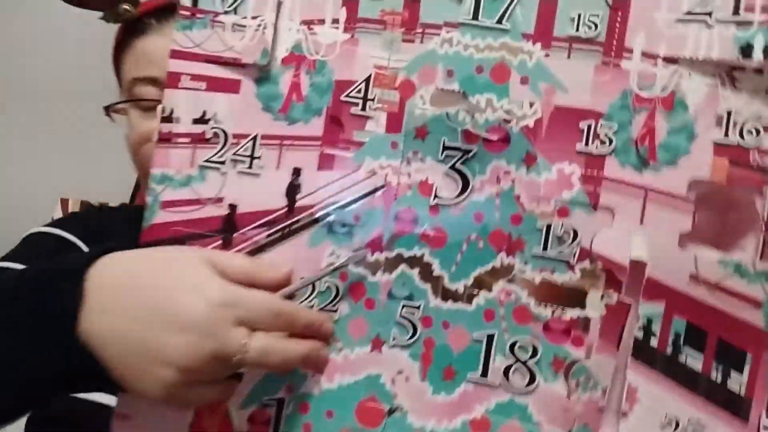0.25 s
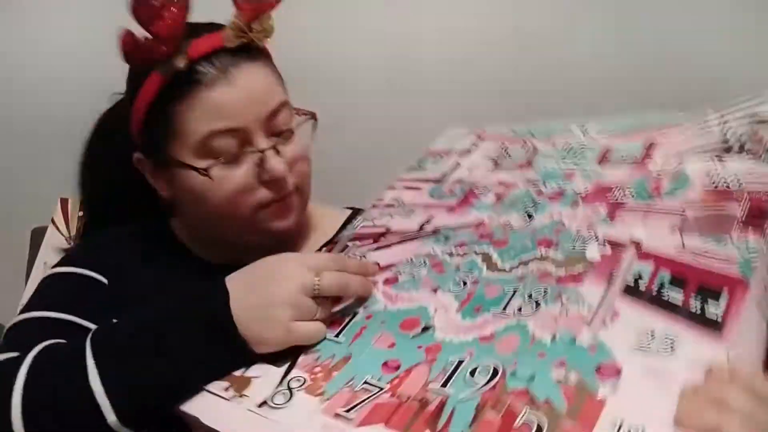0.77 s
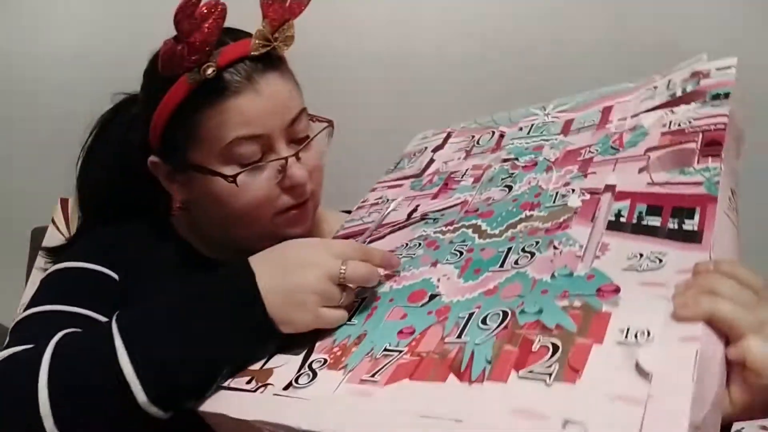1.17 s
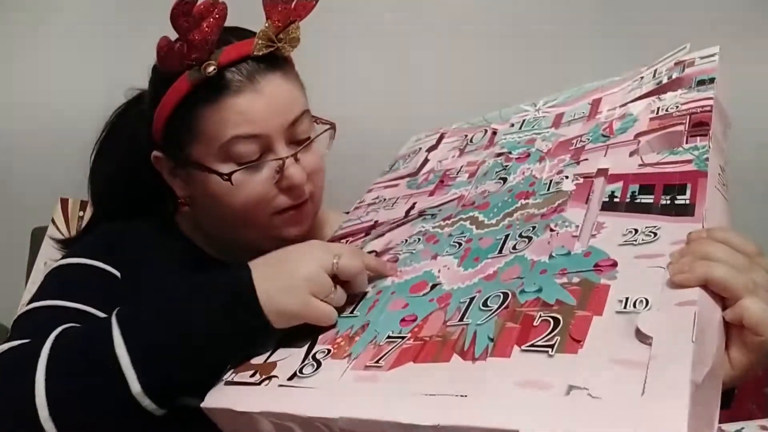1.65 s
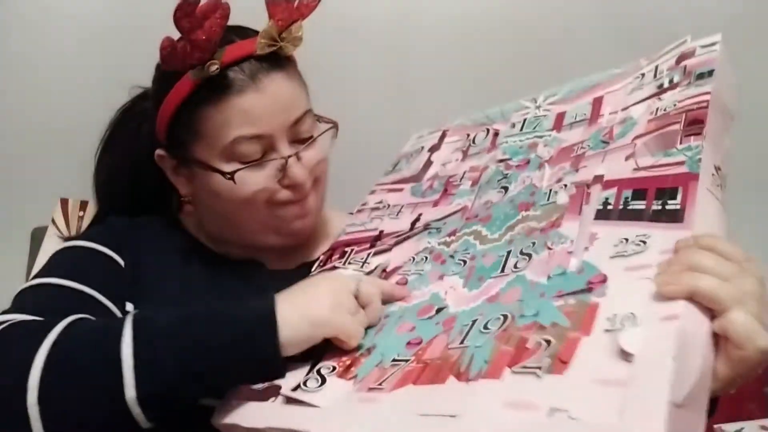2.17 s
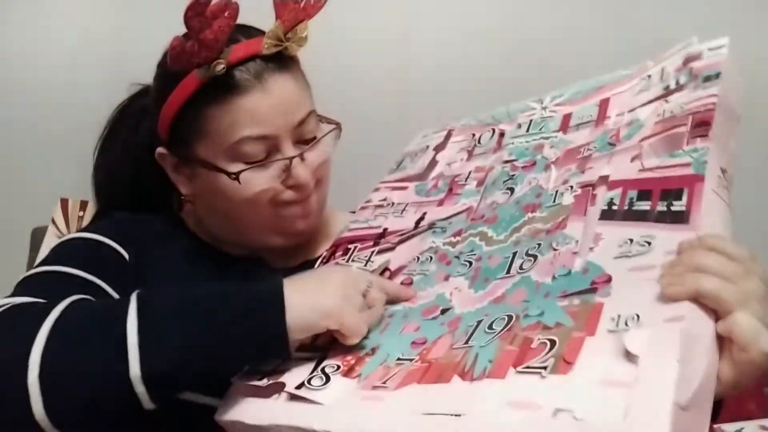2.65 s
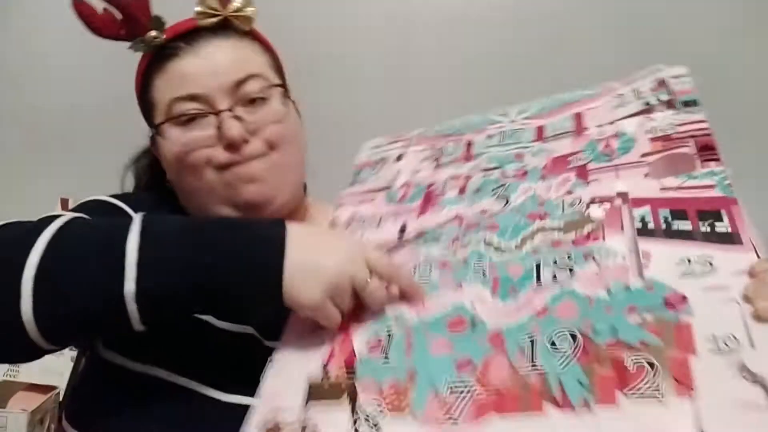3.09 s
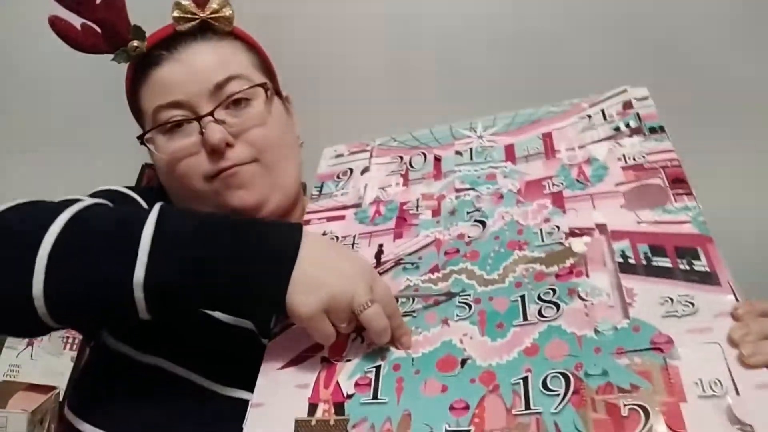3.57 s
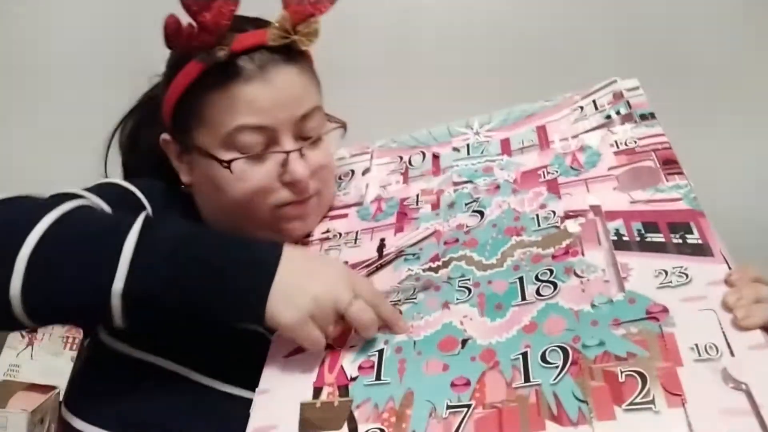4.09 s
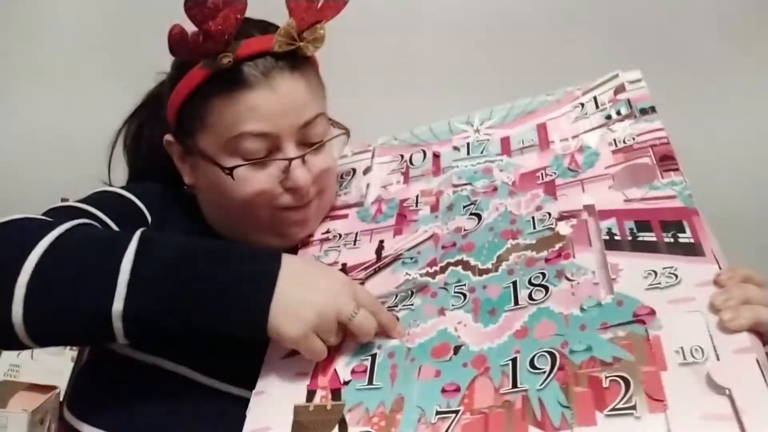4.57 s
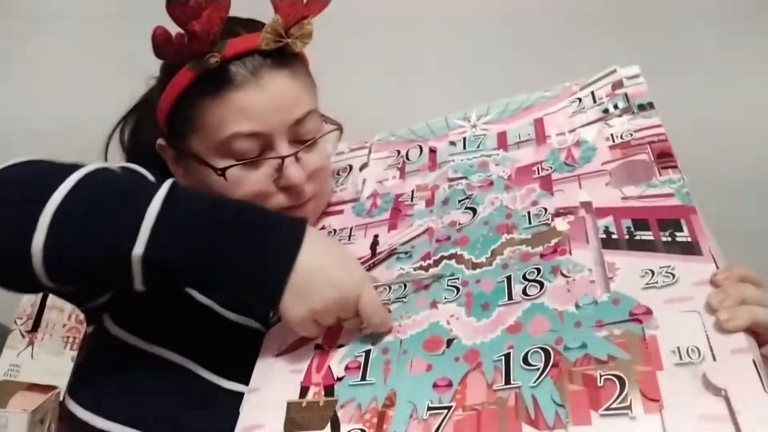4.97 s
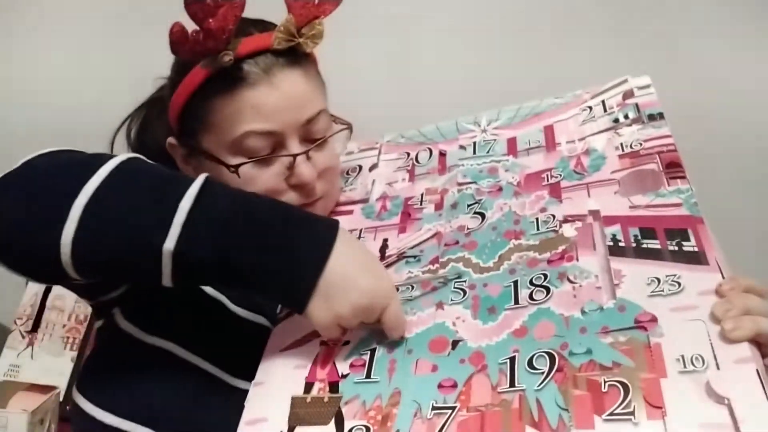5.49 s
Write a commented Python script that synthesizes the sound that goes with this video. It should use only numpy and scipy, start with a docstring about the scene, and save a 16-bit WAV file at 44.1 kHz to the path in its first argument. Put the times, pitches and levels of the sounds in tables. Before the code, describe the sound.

Close, dry clicking and rubbing on perforated cardboard, faint at first, cracking loudly twice before settling into softer picking and creaks.

```python
"""In a small furnished room, fingers pick, scratch and press at the perforated door of a stiff, hollow cardboard box.
Each contact is a short burst of noise for the crack of the paper skin, plus a jolt that rings the board and the hollow.
Between contacts, noise gated by tiny slips makes the rub and creak; short strokes and low bumps join in.
The room answers the contacts with a tail of fading noise, over a faint hum and hiss.
Two microphone ports close by hear it all in stereo."""
import sys
import numpy as np
from scipy import signal
from scipy.fft import rfft, irfft, next_fast_len
from scipy.io import wavfile
from scipy.ndimage import uniform_filter1d, map_coordinates

SR = 44100
rng = np.random.default_rng(int(sys.argv[2]) if len(sys.argv) > 2 else 0)


def int16_out(signal):
    """Quantize to a 16-bit WAV file."""
    q = np.round(np.clip(np.atleast_2d(signal).T, -1, 1) * 32767)
    wavfile.write(sys.argv[1], SR, q.astype(np.int16))


N = 252693  # length in samples


def amp(db):
    """Turn decibels into a gain."""
    return 10 ** (np.asarray(db) / 20)


def unit(x):
    """Scale each row to rms 1."""
    return x / np.sqrt(np.mean(x ** 2, -1, keepdims=True) + 1e-20)


def peak(x):
    """Scale each row so that its loudest 4 ms has rms 1."""
    return x / np.sqrt(np.max(uniform_filter1d(x ** 2, size=180), -1, keepdims=True))


def along(points, hz):
    """Read a curve of (Hz, value) points on a log frequency axis."""
    f, v = np.transpose(points)
    return np.interp(np.log(hz + 1), np.log(f + 1), v)


def curves(rows):
    """Give one value per sample for each column after the time."""
    s, *cols = np.transpose(rows)
    return [np.interp(np.arange(N) / SR, s, c) for c in cols]


def wobble(rate):
    """Draw a smooth random curve with this many knots a second."""
    knots = rng.standard_normal(int(N * rate / SR) + 4)
    return map_coordinates(knots, [np.arange(N) * rate / SR])


def filtered(x, response):
    """Multiply the spectrum of x by a response that depends on frequency."""
    n = x.shape[-1]
    m = next_fast_len(n + 4096)
    return irfft(rfft(x, m) * response(np.fft.rfftfreq(m, 1 / SR)), m)[..., :n]


def resonances(modes, extra_db=0):
    """Ring like a set of damped springs; extra_db changes the level of each mode (last axis)."""
    extra_db = np.broadcast_to(extra_db, np.shape(extra_db)[:-1] + (len(modes),))

    def response(f):
        total = 0
        for k, (centre, width, db) in enumerate(modes):
            level = (-1) ** k * amp(db + extra_db[..., k:k + 1])  # neighbours have opposite signs
            total = total + level * 1j * f * width / (centre * centre - f * f + 1j * f * width)
        return total
    return response


def colour(points):
    """Give the gain of a smooth spectrum of (Hz, dB) points."""
    return lambda hz: amp(along(points, hz))


def pair(a, b, alike):
    """Mix two unrelated signals into left and right that are as alike as asked at each frequency."""
    def turn(hz):
        return np.arccos(np.clip(along(alike, hz), -1, 1)) / 2
    mid = filtered(a, lambda hz: np.cos(turn(hz)))
    side = filtered(b, lambda hz: np.sin(turn(hz)))
    return np.array([mid + side, mid - side])


# ways the cardboard rings, before each spot favours some: centre_hz, width_hz, level_db
BOX_MODES = [(386, 16, -3.5), (643.4, 57, 6), (778.5, 35, 9), (922, 49, 6.5), (1197, 89, 4.5),
             (1403, 140, 6), (1813, 152, 4), (2103, 370, 4), (2600, 500, 4), (3420, 2700, -11)]


def favoured(hz, db_per_octave):
    """Each spot of the board favours the modes near its own pitch."""
    return -db_per_octave * np.abs(np.log2(np.array(BOX_MODES)[:, 0] / hz))


# finger contacts, levels of the loudest 4 ms before the hollow rings on and the ports colour them:
# start_s, bright_crack_db, dull_crack_db, knock_db, hollow_thud_db, knock_pitch_hz
CONTACTS = [(0.071, -33, -54, -46.5, -59, 781.0), (0.133, -48, -50.5, -50, -90, 775.0),
            (0.1912, -40.5, -67, -56, -57, 777), (0.2484, -38, -50, -48.5, -81, 870),
            (0.2917, -39, -43, -46, -52, 920), (0.3705, -46, -44.5, -70, -56, 921.0),
            (0.433, -28, -61, -39.5, -66, 640), (0.6118, -30.5, -37.5, -47, -66, 825.0),
            (0.6733, -33.5, -43.5, -50.0, -58, 929.0), (0.824, -50, -62, -54.5, -63, 670),
            (1.07, -52.5, -53, -47.5, -89, 870), (1.1826, -54, -48, -50, -83, 885),
            (1.3154, -52, -53.5, -50, -63, 960), (1.5436, -56, -59, -60, -74, 870),
            (1.5753, -56, -64.0, -51.5, -64, 646), (1.6453, -49, -45.5, -45.0, -70, 807.0),
            (1.6702, -43, -63, -51, -60, 1420), (1.6847, -39.5, -46.0, -57, -57.0, 1410.0),
            (1.696, -34, -55, -38.5, -54.5, 1230), (1.706, -51, -51, -41.5, -44, 1190),
            (1.7518, -39, -44, -43.5, -68, 940), (1.7566, -35, -43, -42.5, -58, 810),
            (1.8285, -46, -43, -36.5, -58.0, 1000), (1.8479, -37.5, -43, -39.0, -48.5, 970),
            (1.8615, -36, -51, -66, -58, 754), (1.959, -37, -39.5, -32, -50, 950),
            (1.974, -45, -46, -57, -52, 800.0), (2.0517, -36, -47, -49, -50, 641.0),
            (2.0662, -43, -39, -31.5, -41, 830), (2.0916, -18, -47, -28, -22, 780),
            (2.1196, -29.5, -44, -24, -22, 870), (2.158, -19, -23.5, -11, -19.5, 1390),
            (2.2535, -28, -41, -43, -67, 1240.0), (2.3432, -37.5, -64, -46, -46.5, 1410),
            (2.3556, -38, -45, -46, -68, 1220), (2.4061, -27, -37.5, -35, -41, 810),
            (2.5298, -30, -33, -29.5, -43.5, 1070), (2.561, -38, -48, -59, -45, 924),
            (2.5713, -32.5, -44, -31.5, -42.5, 1410), (2.6243, -36, -56, -47, -42, 660.0),
            (2.6927, -36.5, -59, -26.5, -34, 1550), (2.7342, -20, -23.5, -14.5, -29.5, 1480),
            (2.852, -37, -37, -33, -40.5, 980), (3.0256, -37, -40.5, -40.5, -48, 840),
            (3.0474, -31, -34, -33, -37, 2140), (3.116, -39.5, -49, -42.5, -49, 960),
            (3.2318, -45.5, -44, -42.5, -48, 735), (3.3357, -51, -57, -45.5, -60, 905),
            (3.3893, -54, -54, -49.5, -53, 902.0), (3.4316, -47, -59, -42.5, -50, 895),
            (3.491, -68, -61, -44.5, -64, 855), (3.5213, -45.5, -51.5, -46.5, -70, 900),
            (3.5831, -59, -60, -43, -58, 900), (3.7188, -48, -50.5, -41, -51, 990),
            (3.811, -43, -61, -50.5, -61, 950), (3.946, -66, -80, -60, -59, 1085),
            (4.018, -62, -79, -60, -63, 1290), (4.0955, -44.5, -51.5, -57.5, -57.5, 1340),
            (4.2034, -74, -75, -58.5, -72.5, 654), (4.3285, -50, -54, -37.5, -49, 1190),
            (4.3553, -48, -52, -42, -43, 1270.0), (4.3892, -47.5, -51, -57, -65, 910.0),
            (4.4083, -42.5, -49, -35, -47, 1200), (4.4572, -40, -47, -35.5, -36, 910),
            (4.4874, -37, -52, -51, -58, 608), (4.5135, -41.5, -57, -45, -49, 885.0),
            (4.5478, -43, -39, -35.5, -42, 870), (4.6256, -41, -43.5, -35, -48, 950),
            (4.8289, -42, -50, -39.5, -59, 1000), (4.8369, -35.5, -47, -32.5, -30.5, 1200),
            (4.9042, -32.5, -44, -71, -62, 786), (5.0127, -44.5, -51, -64, -69, 740.0),
            (5.0375, -33, -35.5, -30.5, -39, 1060), (5.1286, -38.5, -43.5, -40, -41, 1170),
            (5.2173, -35.5, -60, -54, -48, 876.0), (5.2625, -40.5, -49, -48.5, -52, 840),
            (5.333, -44, -47, -39.5, -43, 634), (5.3556, -25, -27.5, -30.5, -45.5, 1390),
            (5.4201, -57, -47, -40, -54, 690), (5.459, -27.5, -32, -29, -46.5, 780),
            (5.5592, -44, -48, -49, -55, 620), (5.6083, -41, -40, -42.5, -44, 644),
            (5.6903, -41, -45.5, -45.5, -49.5, 1350)]
# ticks of nail and fibres that do not knock the box: start_s, bright_crack_db
TICKS = [(0.387, -42), (0.4475, -31), (0.456, -37), (0.462, -38), (0.921, -60), (0.936, -64), (0.9567, -53),
         (1.7794, -42), (1.7998, -39), (1.874, -48), (1.8889, -41), (1.9184, -35.5), (2.0085, -39),
         (2.0289, -33), (2.3065, -41), (2.402, -42), (2.4518, -35), (2.485, -38), (2.517, -34),
         (2.524, -33.5), (2.729, -38.5), (3.1342, -38), (3.2255, -42.5), (3.397, -48), (3.51, -54),
         (3.5483, -39), (3.6055, -43), (3.634, -47), (3.6897, -43), (3.7373, -41), (4.9756, -56),
         (5.0225, -47), (5.249, -41.5), (5.327, -52), (5.5363, -49)]
TICK_DULL_DB = -13.5  # dull part of a tick against its bright part
# air in the box: centre_hz, width_hz, level_db
HOLLOW_MODES = [(77.6, 32, -21.5), (172.5, 20, -4), (236, 270, -7), (396, 480, 0)]
# dull and bright colour of the paper skin: pitch_hz, level_db (per Hz)
SKIN_DULL = [(1500, -18.5), (3000, 0.5), (5000, -0.5), (7000, -1.5), (9000, -14)]
SKIN_BRIGHT = [(5500, -15), (7500, -8), (10000, 0.5), (13000, -11), (16000, -31.5)]
# the hollow rings on after each contact: centre_hz, width_hz, level_db (against the contact itself)
RING_ON = [(174, 14, 2.5), (348.4, 9.4, 3.5)]


def contacts():
    """A nail lets go or a perforation tears: a short crack, and a jolt that rings the board and the hollow."""
    silent_db = -120
    ticks = [(s, db, db + TICK_DULL_DB, silent_db, silent_db, 800) for s, db in TICKS]
    start_s, bright_db, dull_db, knock_db, thud_db, knock_hz = np.transpose(CONTACTS + ticks)[..., None]
    t = np.arange(2048) / SR
    noise = rng.standard_normal((len(start_s), 5, len(t)))

    # each shape rises softly, then dies away
    jolt = (1 - np.exp(-t / 0.001)) ** 2 * np.exp(-t / 0.0025)
    snap = (1 - np.exp(-t / 0.0003)) ** 2 * np.exp(-t / 0.0015)
    push = (1 - np.exp(-t / 0.0049)) ** 2 * np.exp(-t / 0.0035)

    board = resonances(BOX_MODES, favoured(knock_hz, 10.5))
    knock = peak(filtered(jolt * noise[:, 0], board)) * amp(knock_db)
    thud = peak(filtered(push * noise[:, 1], resonances(HOLLOW_MODES))) * amp(thud_db)
    dull = peak(snap * filtered(noise[:, 2], colour(SKIN_DULL))) * amp(dull_db)

    # the finest crackle reaches the two ports differently
    bright = []
    for side in (1, -1):
        crackle = noise[:, 3] + 0.9 * side * noise[:, 4]
        bright.append(peak(snap * filtered(crackle, colour(SKIN_BRIGHT))) * amp(bright_db))
    left, right = bright

    shared = knock + thud + dull
    heard = room(shared + (left + right) / 2)
    heard[..., :len(t)] += shared[:, None] + np.stack([left, right], 1)
    out = np.zeros((2, N + SR))
    for at, sound in zip(np.round(start_s[:, 0] * SR).astype(int), heard):
        out[:, at:at + sound.shape[1]] += sound
    # one call per ring, so that both keep the same sign
    return filtered(out[:, :N], lambda hz: 1 + resonances(RING_ON[:1])(hz) + resonances(RING_ON[1:])(hz))


# how long the room tail takes to fall by 60 dB: pitch_hz, fade_s
ROOM_FADE = [(200, 0.32), (1000, 0.17), (4000, 0.23), (10000, 0.22)]
# energy of the tail against the direct sound, before its bass is thinned: pitch_hz, level_db
ROOM_SHARE = [(200, 4.5), (900, 2), (2200, 0.5), (4500, -0.5), (10000, 0)]
# left-right likeness of the tail: pitch_hz, likeness (1 = same)
ROOM_ALIKE = [(500, 0.92), (1500, 0.084), (6000, .1)]
RATTLE_DB = 1  # unevenness of the tails as loose board rattles on


def room(rows):
    """Every contact gets its own tail in its broad colour; each frequency dies at its own speed."""
    length = SR // 4
    hz, t, grains = signal.stft(rng.standard_normal((len(rows), 2, length)), SR, nperseg=256)
    power = uniform_filter1d(np.abs(rfft(rows)) ** 2, size=9)
    broad = np.sqrt(power[:, ::rows.shape[1] // 256])
    fade = amp(-60 * t / along(ROOM_FADE, hz)[:, None])
    fade = fade * (t > 0.004) / np.sqrt(128 * np.sum(fade ** 2, -1, keepdims=True))
    share = broad * amp(along(ROOM_SHARE, hz))
    rattle_db = RATTLE_DB * rng.standard_normal((len(rows), 1, 1, len(t)))
    rattle_db = rattle_db - RATTLE_DB ** 2 * np.log(10) / 20  # keeps the average energy
    grains = grains * amp(rattle_db) * fade * share[:, None, :, None]
    tail = signal.istft(grains, SR, nperseg=256)[1][..., :length]
    tail = filtered(tail, lambda f: f ** 2 / (f ** 2 + 110 ** 2))  # the tail is thin in the deep bass
    return pair(tail[:, 0], tail[:, 1], ROOM_ALIKE).swapaxes(0, 1)


def grit(rate, spread_db, life_s, smooth):
    """Gate two noises by tiny slips of uneven size (rate a second), on top of a smooth share."""
    slips = (rng.random(N) < rate / SR) * amp(spread_db * rng.standard_normal(N))
    gate = signal.fftconvolve(slips, np.exp(-np.arange(1024) / SR / life_s))[:N]
    return (smooth + unit(gate)) * rng.standard_normal((2, N))


# rubbing, levels before the random wavering: time_s, pressure_creak_db, sliding_scratch_db
RUB = [(0.0, -48, -52), (0.16, -75, -70), (0.33, -61, -62.5), (0.49, -48, -56), (0.61, -52.5, -49),
       (0.72, -56.5, -66.5), (0.85, -68, -68), (0.95, -74, -66.5), (1.37, -118, -100), (1.6, -54, -65.5),
       (1.74, -43, -77), (1.83, -54, -56), (2.01, -48, -82), (2.44, -54, -54.5), (2.63, -43.5, -48),
       (2.73, -55, -43), (2.84, -51, -49), (2.97, -56.5, -63.5), (3.13, -48.5, -65), (3.42, -69, -62),
       (3.62, -56.5, -61), (3.8, -67.5, -80.5), (3.9, -61, -70.5), (4.13, -77, -76.5), (4.37, -75, -80),
       (4.5, -58, -62.5), (4.74, -50, -60), (4.81, -57, -67), (4.87, -49.5, -53), (5.0, -55, -71),
       (5.2, -47.5, -56), (5.31, -54.5, -84), (5.41, -48, -56), (5.73, -50.5, -57)]
# left-right likeness of the rubbing: pitch_hz, likeness (1 = same)
RUB_ALIKE = [(200, 1), (1500, 0.32), (12000, 0.084)]
GRIP_DB, GRIP_GROWS = -64.5, 0.49  # handling rumble before wavering; how far it follows the pressure


def rubbing():
    """Pressure creaks the board and drums the hollow; sliding skin and nail scratch the printed surface."""
    creak_db, scratch_db = curves(RUB)
    creak = grit(120, 4, 0.004, 0.65)
    creak = unit(filtered(creak, resonances(BOX_MODES, favoured(820, 9))))
    creak = creak * amp(creak_db) * amp(3.5 * wobble(25))

    slide = grit(300, 1.6, 0.0035, 0.28)
    slide = slide * amp(0.8 * wobble(30))
    bright = unit(filtered(slide, colour(SKIN_BRIGHT)))
    dull = unit(filtered(slide, colour(SKIN_DULL)))
    scratch = (bright + amp(-8) * dull) * amp(scratch_db)

    grip_db = GRIP_DB + GRIP_GROWS * (creak_db - creak_db.mean()) + 3.5 * wobble(19)
    grip = unit(filtered(rng.standard_normal((2, N)), resonances(HOLLOW_MODES[:3]))) * amp(grip_db)
    return pair(*(creak + scratch + grip + strokes()), RUB_ALIKE)


# short slides, tears and pushes, levels before the swell shapes them:
# start_s, rise_s, hold_s, rms_db, centre_hz, width_hz
STROKES = [(0.449, 0.0043, 0.04, -50.5, 7700, 8000), (0.537, 0.037, 0.059, -43.5, 10500, 3980),
           (0.953, 0.0022, 0.014, -43, 9800, 3500), (0.956, 0.0075, 0.066, -48, 6800, 2710),
           (2.066, 0.025, 0.0027, -23, 9000, 3835), (2.095, 0.011, 0.03, -25.5, 970, 1350),
           (2.101, 0.0083, 0.022, -38, 8800, 2990), (2.644, 0.013, 0.011, -39, 9500, 4500),
           (2.744, 0.005, 0.043, -35.5, 610, 1060), (2.769, 0.013, 0.031, -34.5, 222, 418),
           (2.872, .01, 0.025, -51, 9050, 5000), (3.33, 0.012, 0.074, -48.5, 860, 484),
           (4.443, 0.0056, 0.027, -40.5, 890, 1050), (4.847, 0.0045, 0.017, -38.5, 670, 920),
           (5.596, 0.0068, 0.044, -45.5, 990, 2100), (5.596, 0.023, 0.036, -44, 9700, 5210)]


def strokes():
    """Dense slips swell, hold and die away in one broad resonance."""
    slips = np.pad(grit(400, 4, 0.001, 0.8), ((0, 0), (0, SR)))
    out = np.zeros((2, N + SR))
    t = np.arange(SR // 4) / SR
    for start_s, rise_s, hold_s, rms_db, centre_hz, width_hz in STROKES:
        at = round(start_s * SR)
        band = resonances([(centre_hz, width_hz, 0)])
        sound = unit(filtered(slips[:, at:at + len(t)], lambda hz: band(hz) ** 2))
        swell = np.clip(t / rise_s, 0, 1) ** 2
        decay = np.exp(-np.clip(t - rise_s - hold_s, 0, 1) / 0.013)
        out[:, at:at + len(t)] += amp(rms_db) * swell * decay * sound
    return out[:, :N]


# low bumps as the box shifts in the hands: start_s, level_db (top of the swell around the sine)
BUMPS = [(0.51, -55.5), (0.66, -56), (1.775, -54), (2.097, -39), (2.16, -44), (2.475, -54), (2.759, -52),
         (4.444, -48.5), (4.83, -48)]
BUMP_S, BUMP_HZ = 0.006, 61.6  # rise of the push; pitch of its sine


def bumps():
    """A soft, slow push, a sine that swells and fades, the same for both ports."""
    t = np.arange(SR // 8) / SR
    out = np.zeros(N + SR)
    push = t / BUMP_S * np.exp(1 - t / BUMP_S) * np.sin(2 * np.pi * BUMP_HZ * t)
    for start_s, level_db in BUMPS:
        out[round(start_s * SR):][:len(t)] += amp(level_db) * push
    return out[:N]


# hiss of the room: pitch_hz, level_db (per Hz, only the shape counts)
AIR = [(18, -3.5), (48, -7.5), (65, -21.5), (85, -19), (120, -24.5), (200, -22), (400, -24.5), (700, -28.5),
       (1200, -35.5), (3000, -41.5), (10000, -40.5), (12500, -39)]
# left-right likeness of the hiss: pitch_hz, likeness (1 = same)
AIR_ALIKE = [(30, 0.06), (90, 0.2), (380, 0.15), (2380, 0.12)]
HUM_HZ, HUM_DB = 100, -73.5  # level before it wavers


def room_tone():
    """A low hum, a sine wavering in level and phase, and a faint hiss of coloured noise."""
    air = unit(filtered(rng.standard_normal((2, N)), colour(AIR)))
    hum_phase = 2 * np.pi * HUM_HZ * np.arange(N) / SR + wobble(1.2)
    hum = amp(HUM_DB + 2.5 * wobble(4)) * np.sin(hum_phase)
    return pair(*air, AIR_ALIKE) * amp(-61.5 + 0.57 * wobble(0.85)) + hum


# the box is lowered, so the delay of the left side changes: time_s, left_delay_ms
LEFT_DELAY = [(0, 0.21), (1.3, 0.3), (1.6, 0.032), (5.73, 0.055)]


def scene():
    """Add up all sounds of the box, let the left side hear them later, and lay the room tone under them."""
    left, right = contacts() + rubbing() + bumps()
    delay_ms, = curves(LEFT_DELAY)
    left = map_coordinates(left, [np.arange(N) - delay_ms * SR / 1000], mode="nearest")
    return np.array([left, right]) + room_tone()


# the capsule loses the top: pitch_hz, level_db
MIC = [(11500, 0), (16000, -12)]
# how the two ports differ: pitch_hz, left_minus_right_db
PORTS = [(3000, 0), (5000, -1), (9500, -6), (13000, 1.5)]
TOP_HZ = 16400  # nothing is kept from here up


def record(dry):
    """The two ports differ in colour, both lose treble, and a sharp limit cuts off the very top."""
    def response(hz):
        port_db = np.outer([0.5, -0.5], along(PORTS, hz))
        return amp(along(MIC, hz) + port_db) * (hz < TOP_HZ)
    return filtered(dry, response)


dry = scene()
out = record(dry)
int16_out(out)
```